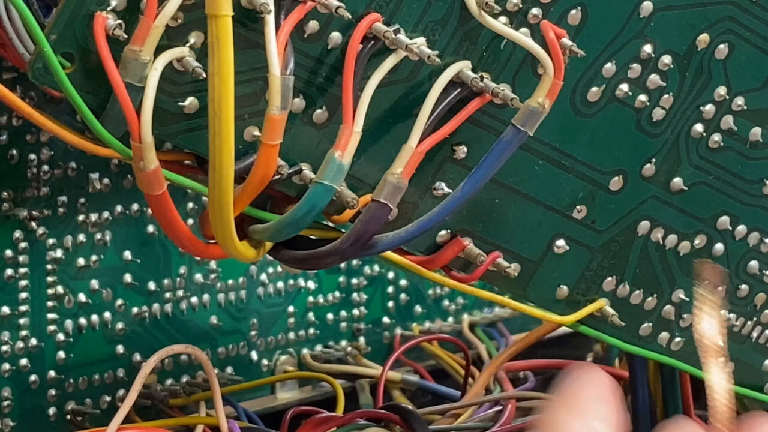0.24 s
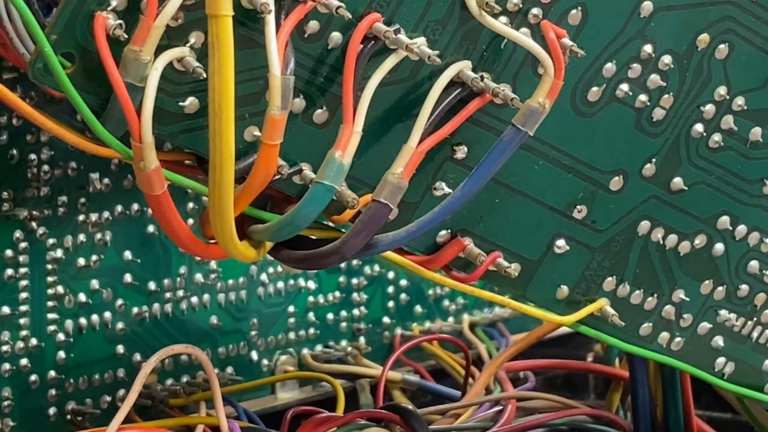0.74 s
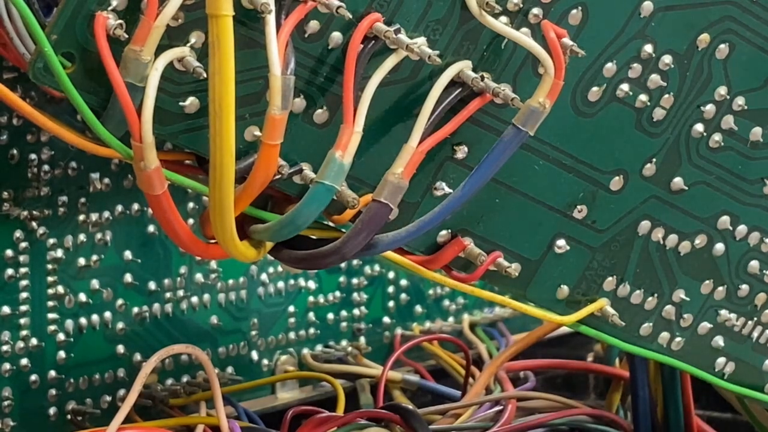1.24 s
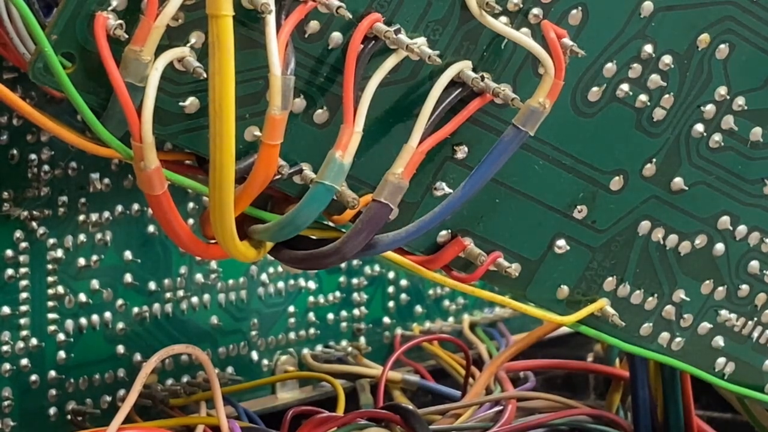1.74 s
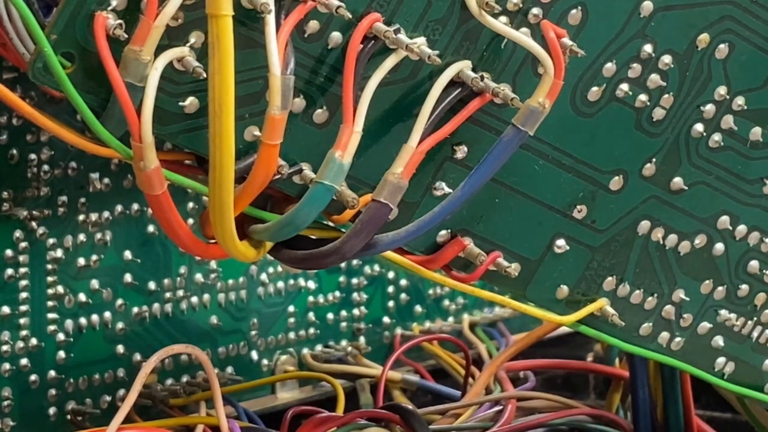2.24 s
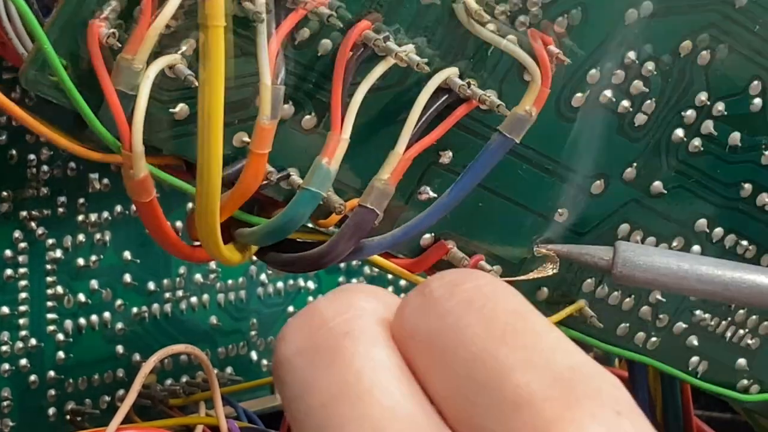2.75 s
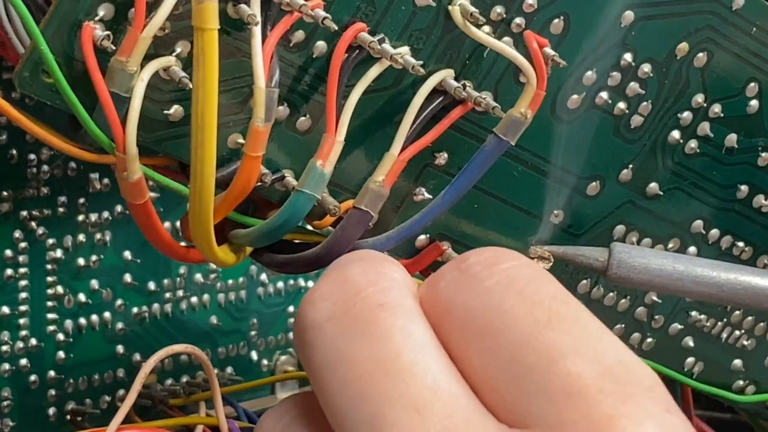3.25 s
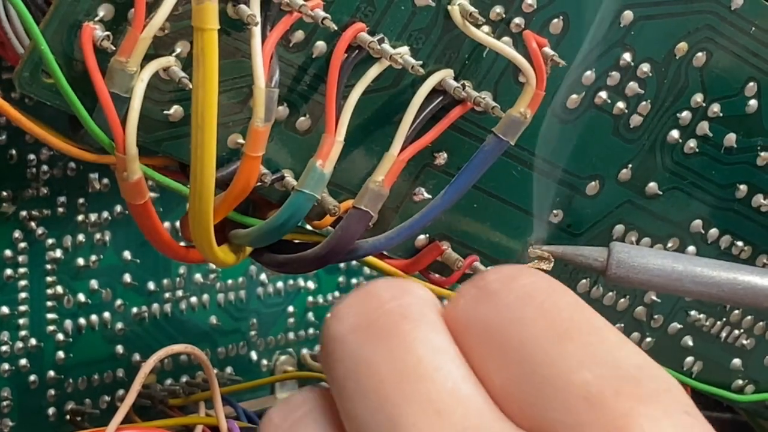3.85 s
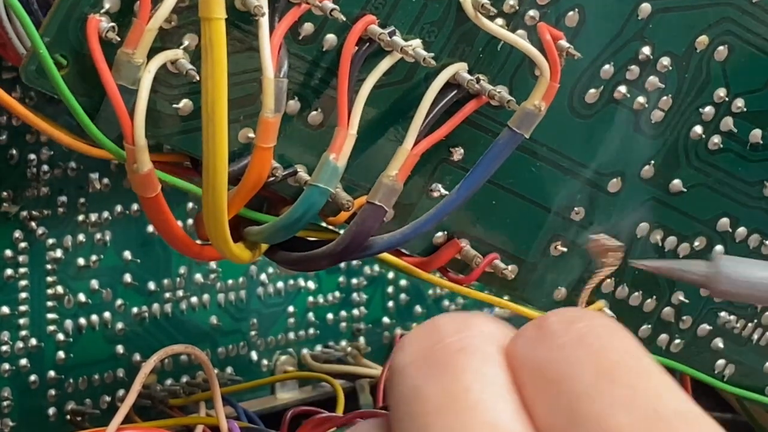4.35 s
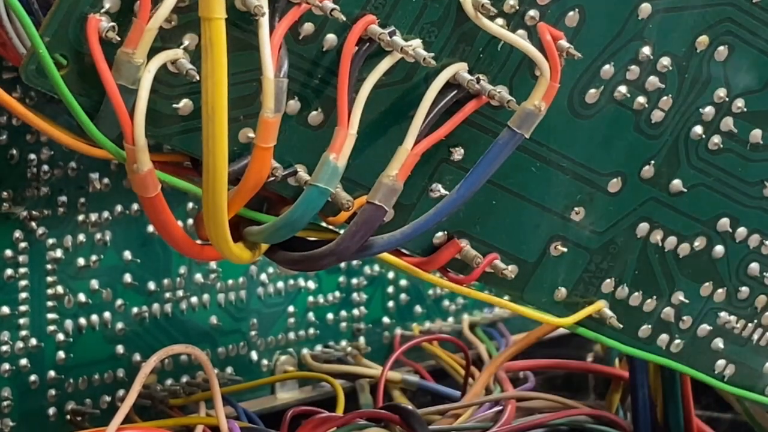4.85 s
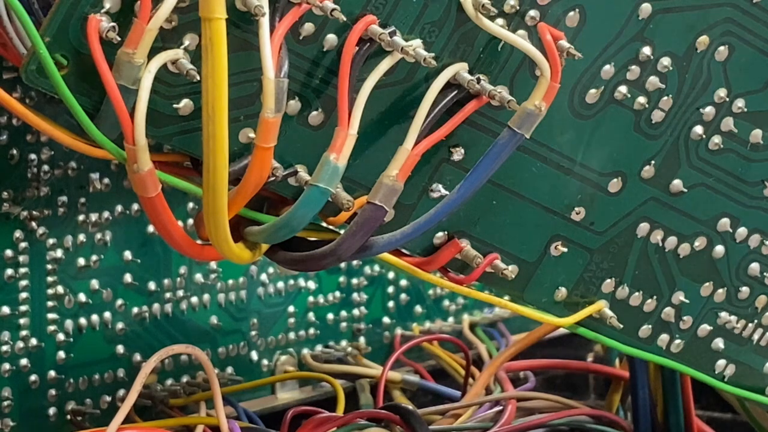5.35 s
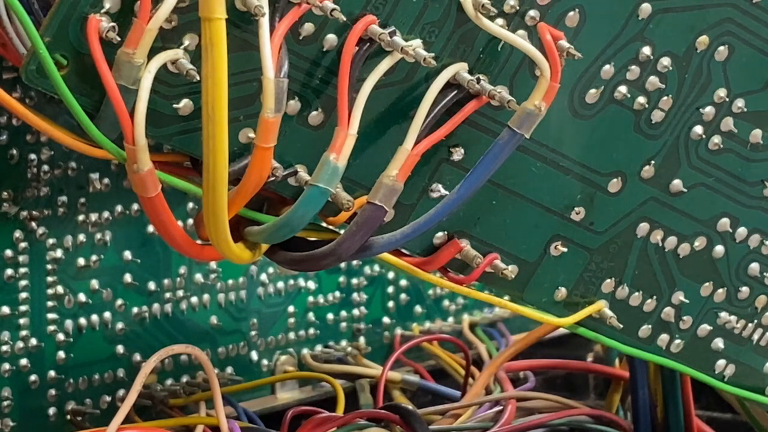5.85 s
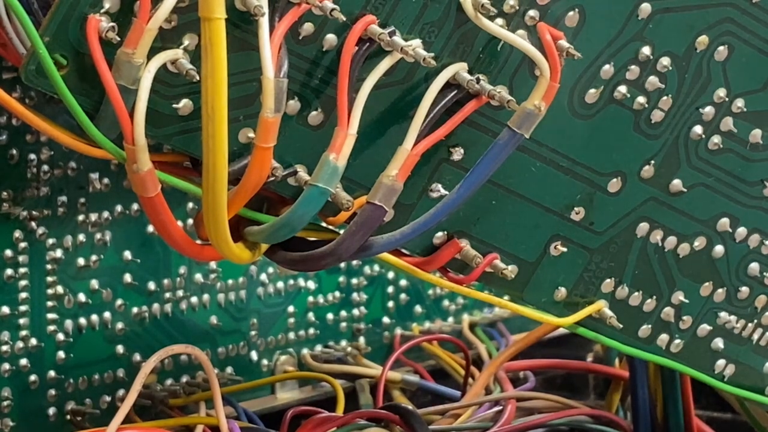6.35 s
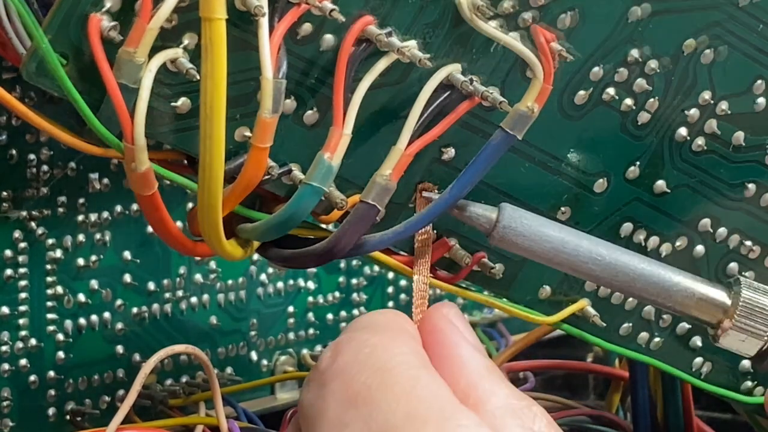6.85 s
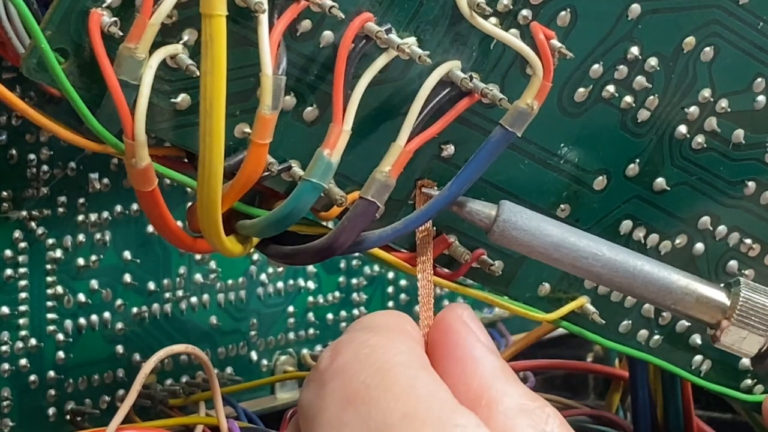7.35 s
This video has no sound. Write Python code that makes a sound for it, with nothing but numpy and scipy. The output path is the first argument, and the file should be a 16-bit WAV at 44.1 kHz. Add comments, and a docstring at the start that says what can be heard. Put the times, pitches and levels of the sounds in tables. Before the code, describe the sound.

After a few faint rubs, a soldering iron strikes its metal holder with a sharp clink, and cutters clatter onto a workbench. A quieter stretch of small taps, rustles and soft bumps on a circuit board follows. Near the end comes a second clink, then the cutters skid and clatter down again. The microphone is close, in a quiet room with low rumbling ventilation.

```python
"""Ventilation rumbles in a quiet room, and fingers and braid scuff and tick on a circuit board, with faint
airy swishes: someone is soldering. The iron clinks into its steel holder; cutters snip, drop and bounce.
Each blow is a crack, ringing metal and a thud of the bench. A hand leans on the board, and later the
cutters land again and slide. Two close microphone ports hear it all, with a first bounce and a short room."""
import sys
import numpy as np
from scipy import signal
from scipy.fft import rfft, irfft, next_fast_len
from scipy.io import wavfile
from scipy.ndimage import uniform_filter1d, map_coordinates

SR = 44100
rng = np.random.default_rng(int(sys.argv[2]) if len(sys.argv) > 2 else 0)


def generate_wav(signal):
    """Clip the signal to [-1, 1] and save it as 16-bit WAV at the path in sys.argv[1]."""
    frames = np.transpose(np.atleast_2d(signal))
    scaled = np.clip(frames, -1, 1) * 32767
    pcm = np.round(scaled).astype(np.int16)
    wavfile.write(sys.argv[1], SR, pcm)


N = 334719


def amp(db):
    return 10 ** (np.asarray(db) / 20)


def unit_rms(x):
    return x / np.sqrt(np.mean(x ** 2) + 1e-20)


def curve_at(points, hz):
    """Reads (frequency, value) points along a log frequency axis."""
    freqs, values = np.transpose(points)
    return np.interp(np.log(hz + 1), np.log(freqs + 1), values)


def wobble(rate):
    """A smooth random curve, rate knots a second."""
    return map_coordinates(rng.standard_normal(int(N * rate / SR) + 4), [np.arange(N) * rate / SR])


def filtered(x, response):
    """Passes x through a complex frequency response."""
    size = next_fast_len(x.shape[-1] + SR // 4)
    return irfft(rfft(x, size) * response(np.fft.rfftfreq(size, 1 / SR)), size)[..., :x.shape[-1]]


def band(hz, width_hz):
    """The response of one resonance."""
    return lambda f: 1j * f * width_hz / (hz * hz - f * f + 1j * f * width_hz)


def place(track, start, peak_db, sound):
    """Lays a sound into the track, peaking at peak_db."""
    track[round(start * SR):][:len(sound)] += amp(peak_db) * sound / np.max(np.abs(sound))


# Stereo image of the room's air: (frequency [Hz], left-right correlation [0-1])
PORT_LIKENESS = [(60, 1), (200, 0.92), (700, .65), (1300, 0.35), (2400, 0.98), (5000, 0.98)]
def diffuse(pair, gain=np.ones_like):
    """Turns two noises into left and right: diffuse sound is only partly alike at the ports."""
    def response(hz):
        angle = np.arccos(np.clip(curve_at(PORT_LIKENESS, hz), -1, 1)) / 2
        return gain(hz) * np.array([np.cos(angle), np.sin(angle)])
    mid, side = filtered(pair, response)
    return np.array([mid + side, mid - side])


# Tone of the air bed: (frequency [Hz], relative density [dB])
VENT_SPECTRUM = [(12, -59.5), (24, -29), (33, -16.5), (42, -5.5), (65, -0.5), (128, -9), (179, -18.5),
                 (251, -14.5), (323, -20), (690, -25.5), (1180, -38), (1690, -44), (1840, -39.5),
                 (3620, -42), (4410, -48), (16500, -60)]
# Its fader ride: (time [s], level [dB])
VENT_RIDE = [(0.0, -56.5), (3.97, -57), (4.14, -56.5), (4.949, -57), (6.321, -54), (7.59, -59.5)]
# Faint whines on top: (centre [Hz], width [Hz], level [dB])
VENT_WHINES = [(1690, 28, -84.5), (2500, 100, -86.5), (3574, 70, -92)]
def ventilation():
    """Moving air: a lumpy rumble, a thin hiss and a few narrow bands of noise."""
    spectra = signal.stft(rng.standard_normal((2, N)), nperseg=512)[2]
    lumps = uniform_filter1d(rng.standard_normal(spectra.shape[1:]), size=6, axis=0)
    lumps_db = 0.96 * unit_rms(uniform_filter1d(lumps, size=14, axis=1))
    noise = signal.istft(spectra * amp(lumps_db), nperseg=512)[1][:, :N]
    rush = unit_rms(diffuse(noise, lambda hz: amp(curve_at(VENT_SPECTRUM, hz))))
    ride_db = np.interp(np.arange(N) / SR, *np.transpose(VENT_RIDE))
    swell_db = 0.9 * wobble(3.8)
    whine = sum(amp(db) * unit_rms(filtered(rng.standard_normal(N), band(hz, width)))
                for hz, width, db in VENT_WHINES)
    return amp(ride_db + swell_db) * rush + whine


def stroke(progress, press, lift=0.2, fade_db=-3):
    """A fading envelope; press and lift are the shares of it spent on attack and release."""
    ramps = np.minimum(progress / press, (1 - progress) / lift)
    return amp(fade_db * progress.clip(0, 1)) * ramps.clip(0, 1)


# Base tone of a scuff or rustle: (frequency [Hz], relative density [dB])
RUSTLE_SPECTRUM = [(120, -20), (300, 0), (800, -0.5), (1500, 5.5), (3100, 0.5), (6000, -3), (9000, -11.5),
                   (16500, -21)]
# Rubs on the board, and the rustle of tools settling just after they land:
# (start [s], length [s], level [dB], low-end weight at 800 Hz [dB])
RUSTLE_CUES = [(0.132, 0.092, -73, 5), (0.558, 0.044, -59.5, 7), (0.753, 0.084, -61.5, 3),
               (0.819, 0.078, -62.5, 1.5), (1.253, 0.0385, -50.5, 11), (1.274, 0.13, -57.5, 3),
               (1.417, 0.062, -48.5, 11.5), (1.457, 0.12, -59.5, 2), (1.819, 0.16, -64, 6),
               (1.996, 0.093, -62, 2), (2.076, 0.086, -63.5, 2.5), (2.194, 0.048, -64.5, 6),
               (2.643, 0.052, -51, 10.5), (2.747, 0.036, -57, 3), (3.074, 0.083, -54, 7.5),
               (3.153, 0.083, -60, 15.5), (3.278, 0.17, -69.5, -7), (4.048, 0.085, -55, 3),
               (4.105, 0.11, -52.5, 13), (4.176, 0.11, -46, 6), (5.148, 0.17, -58, 13),
               (5.403, 0.15, -50.5, -0.5), (5.571, 0.029, -48.5, -1.5), (5.587, 0.12, -55.5, 4.5),
               (6.253, 0.16, -50, 6), (6.72, 0.068, -66, 6), (7.066, 0.065, -68.5, -3)]
def scuffs_and_settling():
    """Rubs and settling tools: dense uneven grains, coloured each time by other small resonances."""
    track, t = np.zeros(N + SR), np.arange(SR // 4) / SR
    grains = rng.standard_normal(N + SR) * amp(np.pad(2 * wobble(70) + 3.2 * wobble(600), (0, SR)))
    for start, length, db, weight_db in RUSTLE_CUES:
        ripple_db = 3.5 * rng.standard_normal(SR // 600)  # one knot every 300 Hz
        low_shelf = [(150, 2.1 * weight_db), (800, weight_db), (1500, 0.006)]
        colour = lambda hz: amp(curve_at(RUSTLE_SPECTRUM, hz) + curve_at(low_shelf, hz)
                                + map_coordinates(ripple_db, [hz / 300]))
        first = round(start * SR)
        rustle = unit_rms(filtered(grains[first:][:len(t)], colour))
        track[first:][:len(t)] += amp(db) * stroke(t / length, press=0.25) * rustle
    return track[:N]


# Small dry taps on the board: (time [s], peak [dB], centre [Hz])
TICK_CUES = [(0.1531, -49, 2560), (0.5664, -48, 4200), (0.856, -47, 2070), (1.2661, -23, 3650),
             (1.2705, -66, 5310), (1.348, -39, 3300), (1.442, -29, 4130), (2.2093, -46, 4270),
             (2.5736, -40.5, 4200), (2.6311, -37, 4970), (2.654, -39.5, 1085), (2.755, -45, 2210),
             (2.761, -41.5, 2900), (3.133, -46, 2040), (3.16, -52, 2240), (3.1797, -48, 1940),
             (3.1965, -48, 1980), (4.0839, -28.5, 1230), (4.11, -29.5, 1200), (4.1947, -31.5, 2860),
             (5.156, -41, 2460), (5.219, -37.5, 3010), (5.5858, -29, 4150), (5.848, -31.5, 1640),
             (6.7298, -41, 2850), (6.76, -43, 2800), (6.82, -57, 2960), (7.2291, -58, 1745)]
def ticks(snap_s=0.0015, tail_db=-4, tail_t60=0.064):
    """Light contacts: a puff of noise in one broad resonance, with a little sheen and no ring."""
    track, t = np.zeros(N + SR), np.arange(SR // 8) / SR
    envelope = np.exp(-t / snap_s) + amp(tail_db - 60 * t / tail_t60)
    for start, db, hz in TICK_CUES:
        puff = envelope * rng.standard_normal(len(t))
        body = filtered(filtered(puff, band(hz, 0.65 * hz)), band(hz, 1.7 * hz))
        sheen = amp(-19) * filtered(puff, band(11430, 5000))
        place(track, start, db, body + sheen)
    return track[:N]


# Airy treble swishes: (start [s], length [s], level at the crest [dB])
SWISH_CUES = [(.16, .065, -72), (.455, .06, -88), (4.038, .09, -71), (4.584, .055, -69),
              (4.97, 0.16, -83.5)]
def swishes():
    """Smooth high hiss that swells and sinks, like braid or a sleeve brushing past."""
    t = np.arange(N) / SR
    swell = sum(amp(db) * np.sin(np.pi * ((t - start) / length).clip(0, 1))
                for start, length, db in SWISH_CUES)
    hiss = filtered(rng.standard_normal(N), lambda hz: band(9500, 14000)(hz) ** 2)
    return swell * unit_rms(hiss)


def ring(modes, favour_db, scatter_db, rise_s, blur):
    """Damped modes, each struck at a new strength; loose contact blurs their phase and shakes their level."""
    hz, db, t60 = np.transpose(modes)[..., None]
    t = np.arange(int(SR * min(t60.max(), 0.25))) / SR
    struck_db = db + favour_db(hz) + scatter_db * rng.standard_normal(hz.shape)
    drift = blur * np.cumsum(rng.standard_normal((len(modes), len(t))), axis=1)
    phase = drift + rng.uniform(0, 2 * np.pi, hz.shape)
    steps = np.repeat(rng.standard_normal((len(modes), len(t) // 256 + 1)), 256, axis=1)[:, :len(t)]
    flutter_db = 4 * uniform_filter1d(steps, size=256, axis=1)
    partials = amp(struck_db + flutter_db - 60 * t / t60) * np.sin(2 * np.pi * hz * t + phase)
    return (1 - np.exp(-t / rise_s)) * partials.sum(axis=0)


# The bench top's thud: (frequency [Hz], level [dB], t60 [s])
BENCH_MODES = [(101.97, -8.5, 0.24), (157, -9, 0.27), (221.6, -5, 0.052), (283, -4, 0.14),
               (407.6, 1.5, 0.09), (562, -10, .06)]
def blows(cues, modes, rattle_s, ring_db, focus_db, wash_db, wash_t60, blur, lowpass_hz):
    """A contact crack with a wash of small dense modes behind it; the metal rings and the bench thuds."""
    track, t = np.zeros(N + SR), np.arange(SR // 5) / SR
    attack = 1 - np.exp(-t / 0.00078)
    envelope = attack * (np.exp(-t / rattle_s) + amp(wash_db - 60 * t / wash_t60))
    for start, db, bright_hz, thud_db in cues:
        burst = envelope * rng.standard_normal(len(t))
        crack = filtered(burst, band(min(bright_hz, 3500), 1.1 * bright_hz))
        crack = filtered(crack, lambda hz: band(2400, 3600)(hz) / (1 + 1j * hz / lowpass_hz))
        place(track, start, db, crack)
        # where the blow lands decides which modes it favours
        octaves = lambda hz: np.log2(hz / bright_hz)
        favour_db = lambda hz: 7 * np.exp(-(octaves(hz) / 0.11) ** 2) - focus_db * octaves(hz) ** 2
        metal = ring(modes, favour_db, scatter_db=2.5, rise_s=rattle_s / 2, blur=blur)
        place(track, start, db + ring_db, metal)
        thud = ring(BENCH_MODES, np.zeros_like, scatter_db=7, rise_s=0.0004, blur=0.05)
        place(track, start, db + thud_db, thud)
    return track[:N]


# The steel holder's ring: (frequency [Hz], level [dB], t60 [s])
HOLDER_MODES = [(1680, -9, .07), (1676, -29.5, .3), (2280, -13.5, 0.045), (3467, -5.5, .062),
                (3960, -14.5, 0.05), (5574, -5, 0.071), (5505, -26, 0.36), (6580, -20, .09),
                (7710, -12.5, 0.086), (8800, -31.5, .07), (11800, -24.5, 0.054)]
# Iron hits: (time [s], crack peak [dB], brightness [Hz], thud relative to crack [dB])
CLINK_CUES = [(1.1074, -7, 4453, -19), (5.3973, -21, 3566, -19.5), (5.4076, -6, 3250, -10),
              (5.4849, -35.5, 5440, -11.5)]
def iron_clinks():
    """The iron strikes its steel holder: a bright clink in which two modes linger."""
    return blows(CLINK_CUES, HOLDER_MODES, rattle_s=0.0018, ring_db=-3, focus_db=-0.5,
                 wash_db=-23.5, wash_t60=0.088, blur=0.045, lowpass_hz=9040)


# The cutters' short clank: (frequency [Hz], level [dB], t60 [s])
CUTTER_MODES = [(1109, -10, 0.073), (1244, -1, 0.041), (1674, -15.5, 0.08), (2163, -0.5, 0.047),
                (2344, -5, 0.037), (2880, -2, .025), (3550, -8, 0.049), (3907, -10, 0.027),
                (5284, -14, 0.013), (6008, -14, 0.063), (8000, -23.5, 0.029), (10963, -22, 0.0096)]
# Cutter hits: (time [s], crack peak [dB], brightness [Hz], thud relative to crack [dB])
CUTTER_CUES = [(1.8939, -4.5, 6010, -17.5), (1.9335, -13, 2850, -10), (1.9514, -17.5, 2840, -22.5),
               (1.9785, -18, 2830, -18.5), (1.9924, -19, 1293, -8), (2.0024, -31, 1720, 10),
               (5.7798, -23, 2390, -24.5), (6.2635, -35, 2630, -21.5), (6.3262, -17, 3790, -26.5),
               (6.364, -20.5, 2357, -5.5), (6.3712, -12, 3400, -24.5), (6.3755, -7.5, 2275, -18),
               (6.4199, -43.5, 2200, -0.5), (6.4271, -22.5, 3040, -3.5)]
def cutter_clatter():
    """The cutters close, land and bounce on the bench; their ring dies quickly."""
    return blows(CUTTER_CUES, CUTTER_MODES, rattle_s=0.0032, ring_db=-1.5, focus_db=4,
                 wash_db=-22.5, wash_t60=0.033, blur=0.055, lowpass_hz=6500)


# Soft low bumps: (time [s], peak [dB])
NUDGE_CUES = [(4.082, -40), (4.112, -41.5), (4.126, -40.5), (4.156, -47), (4.19, -49), (4.245, -48),
              (4.53, -48)]
def hand_nudges():
    """A hand leans on the board; such soft pushes mostly stir the lowest modes of the bench."""
    track = np.zeros(N + SR)
    tilt_db = lambda hz: -7 * np.log2(hz / 100)
    for start, db in NUDGE_CUES:
        place(track, start, db, ring(BENCH_MODES, tilt_db, scatter_db=0.5, rise_s=0.0038, blur=0.039))
    return track[:N]


# Skids on the bench: (start [s], length [s], friction drive [dB])
SLIDE_CUES = [(5.849, 0.054, -43), (5.908, 0.059, -43), (6.26, 0.06, -54), (6.338, .04, -51.5)]
def cutter_slides():
    """Friction grains ring the loose cutters: their modes, widened, over the dry rub."""
    t = np.arange(N) / SR
    pressure = sum(amp(db) * stroke((t - start) / length, press=0.08) for start, length, db in SLIDE_CUES)
    grains = unit_rms(rng.standard_normal(N) * amp(3 * wobble(110) + 1.6 * wobble(530)))
    steel = lambda f: sum((-1) ** k * amp(db) * band(hz, 7.5 / t60)(f)
                          for k, (hz, db, t60) in enumerate(CUTTER_MODES))
    dry_rub = lambda f: amp(-21.5) * band(3000, 5000)(f)
    return amp(11) * filtered(pressure * grains, lambda f: steel(f) + dry_rub(f))


# Width from the first bounce: (frequency [Hz], side relative to mid [dB])
BOUNCE_WIDTH = [(60, -17.5), (160, -13), (450, -11), (740, -5.5), (1220, -6), (2010, -10), (3330, -18),
                (5500, -26.5), (9000, -34.5)]
def first_bounce(sources, t60=0.035):
    """Each source has its own bounce off bench and board, which reaches the two ports unlike."""
    t = np.arange(SR // 25) / SR
    echoes = rng.standard_normal((len(sources), len(t))) * amp(-60 * t / t60)
    echoes /= np.linalg.norm(echoes, axis=1, keepdims=True)
    bounced = signal.oaconvolve(sources, echoes, axes=1).sum(axis=0)[:N]
    side = filtered(bounced, lambda hz: amp(curve_at(BOUNCE_WIDTH, hz)))
    return np.array([side, -side])


# Reverb time: (frequency [Hz], t60 [s])
ROOM_DECAY = [(150, 0.49), (1000, 0.29), (4000, 0.22), (12000, 0.14)]
def room(x):
    """A short diffuse tail whose treble dies first."""
    hz, t, spectra = signal.stft(rng.standard_normal((2, SR // 2)), SR, nperseg=256)
    decay = amp(-60 * t / curve_at(ROOM_DECAY, hz)[:, None])
    tail = signal.istft(spectra * decay, SR, nperseg=256)[1]
    response = diffuse(tail) / np.linalg.norm(tail[0])
    predelayed = np.pad(x, (200, 0))
    return signal.fftconvolve(predelayed[None], response, axes=1)[:, :N]


def scene():
    """The close bench sounds, their bounce and the room, over the air bed."""
    sources = np.array([iron_clinks(), cutter_clatter() + cutter_slides(), ticks(),
                        scuffs_and_settling() + swishes() + hand_nudges()])
    direct = sources.sum(axis=0)
    return direct + first_bounce(sources) + amp(-16) * room(direct) + ventilation()


# Treble phase between the ports: (frequency [Hz], left ahead of right [rad])
PORT_PHASE = [(7400, 0), (8300, -2.4), (10400, -5.6), (12800, -9), (16400, -13.5)]
def record(dry):
    """The two microphone ports part in phase up the treble; nothing passes above the band limit."""
    limit_hz, rolloff_hz = 16850, 600
    ports = filtered(dry, lambda hz: np.exp(0.5j * curve_at(PORT_PHASE, hz) * [[1], [-1]]))
    return filtered(ports, lambda hz: np.clip((limit_hz - hz) / rolloff_hz, 0, 1) ** 2)


dry = scene()
out = record(dry)
generate_wav(out)
```